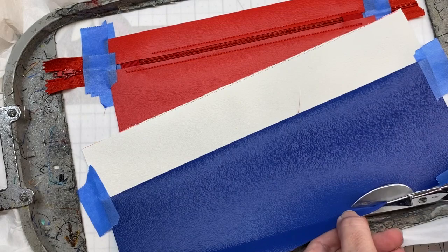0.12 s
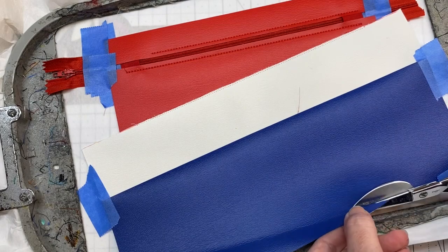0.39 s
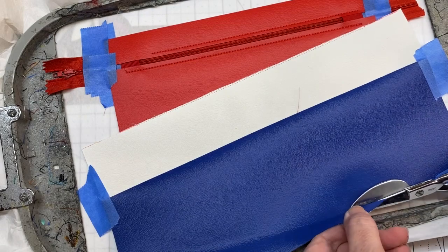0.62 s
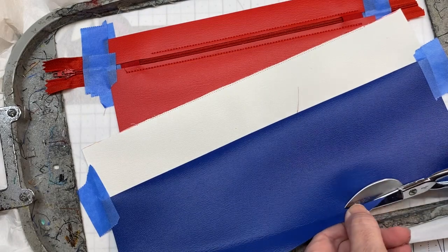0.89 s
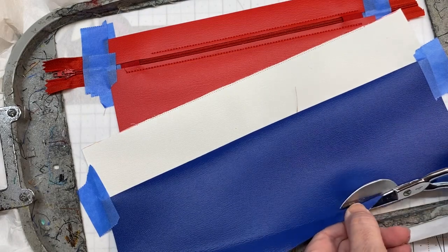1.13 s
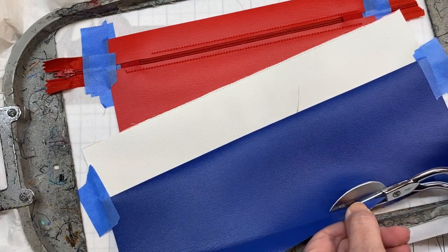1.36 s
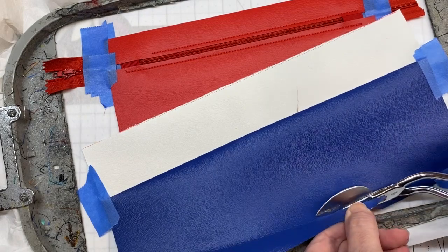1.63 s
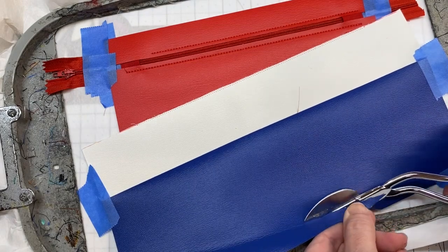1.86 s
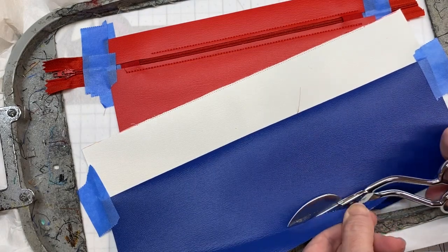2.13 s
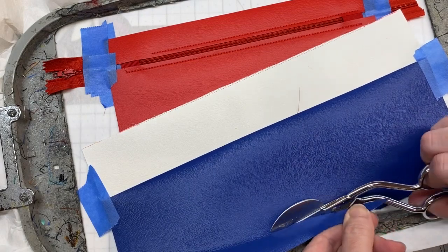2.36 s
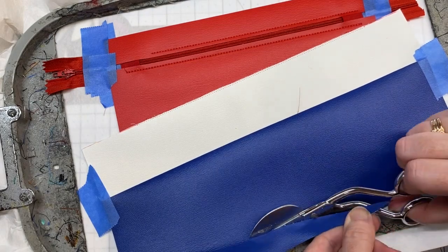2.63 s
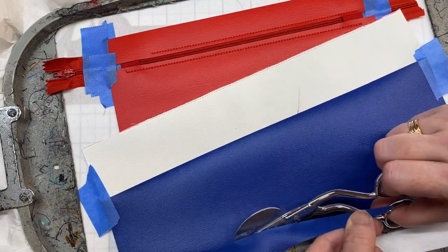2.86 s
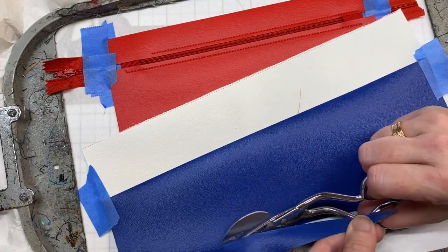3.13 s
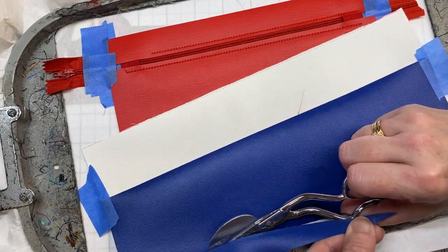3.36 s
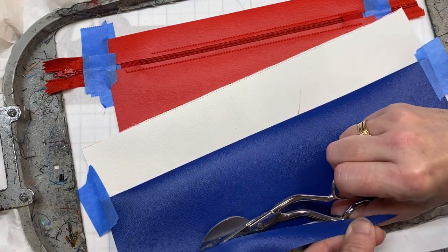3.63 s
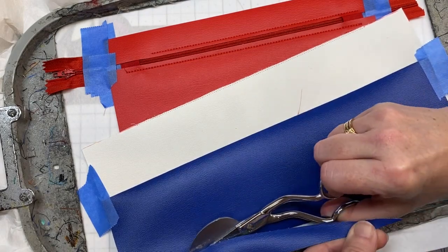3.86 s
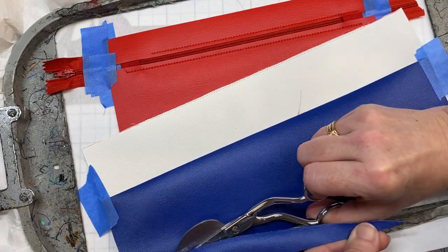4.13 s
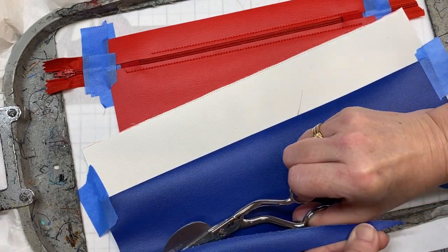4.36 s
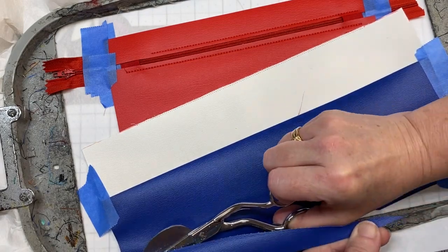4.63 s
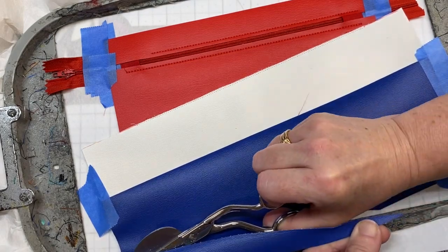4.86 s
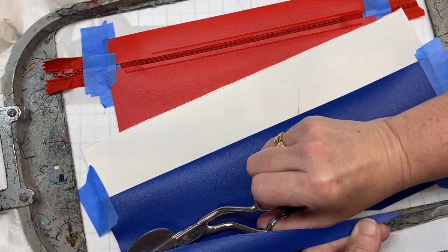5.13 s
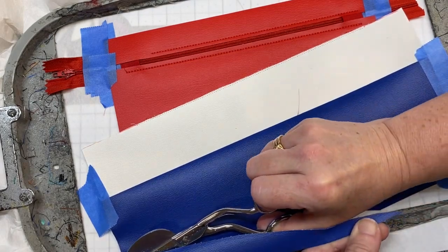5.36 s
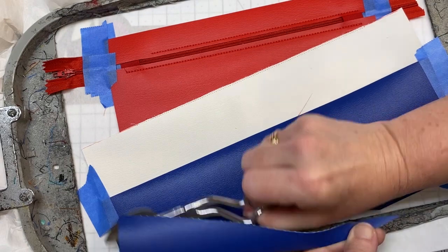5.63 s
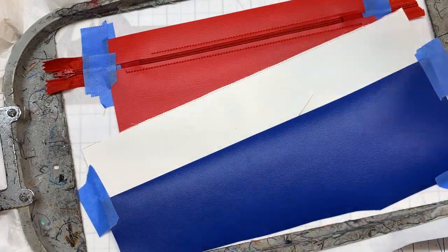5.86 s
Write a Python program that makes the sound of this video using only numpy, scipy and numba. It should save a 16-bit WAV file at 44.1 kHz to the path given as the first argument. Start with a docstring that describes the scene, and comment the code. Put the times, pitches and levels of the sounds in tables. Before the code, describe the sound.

A close, dry stereo perspective in a small quiet room with a very faint hush. At about 0.2 s the blades slide with a small crisp scrape and the vinyl crinkles in tiny cracks; bright ticks follow at 0.4 to 0.7 s with a light rustle and soft table rumble. A dull knock comes near 1.0 s and a tick just after. From about 1.2 s to 5.2 s the scissors shear slowly through cloth-backed vinyl: a quiet, grainy, fluttering rasp of threads parting dozens of times a second, stronger around 2.9 s, swelling and easing, growing brighter and raspier towards the tips. Low hand rumbles and rubs run beneath. The cut thins to sparse ticks, then a quick slide leads to a loud, sharp, bright steel clap at 5.58 s with a brief thin ring and a table thud. Soft knocks, scraping and sheet rustle follow until about 6 s.

```python
"""Scissors through cloth-backed vinyl

Small steel scissors shear slowly through cloth-backed vinyl held in a hoop on a table, in a quiet room.
Backing threads part one by one as puffs of noise, which resonances of sheet and steel colour. The film
crinkles in short cracks; the hand makes the table rumble through its low modes. At the end the blades
clap shut as a cluster of stiff modes, and the scissors are lifted away with a last slide and rustle."""
import sys
import numpy as np
from scipy import signal
from scipy.fft import rfft, irfft, next_fast_len
from scipy.io import wavfile
from scipy.ndimage import uniform_filter1d
from numba import njit

SR = 44100
rng = np.random.default_rng(int(sys.argv[2]) if len(sys.argv) > 2 else 0)


def file_out(sig):
    """Save sig as 16-bit WAV at sys.argv[1]."""
    # one column per channel
    cols = np.atleast_2d(sig).T
    # limit, then scale
    lim = np.clip(cols, -1, 1)
    pcm = np.round(lim * 32767).astype(np.int16)
    wavfile.write(sys.argv[1], SR, pcm)


def rack_gain(trim_db):
    """Turn a fader trim in dB into the linear factor to multiply a signal by."""
    fader = np.asarray(trim_db, float)
    return 10 ** (fader / 20)


N = 264600   # samples: six seconds


def rms_one(x):
    """Scales a sound to an average (rms) level of 1."""
    return x / np.sqrt(np.mean(x ** 2) + 1e-20)


def in_time(rows):
    """Draws straight lines between table rows; the first column is the time in seconds."""
    s, *columns = np.transpose(rows)
    return [np.interp(np.arange(N) / SR, s, c) for c in columns]


def band(x, low_hz, high_hz, order=2):
    """Keeps the tones between two pitches."""
    sos = signal.butter(order, [low_hz, min(high_hz, .47 * SR)], "band", fs=SR, output="sos")
    return signal.sosfilt(sos, x)


def drift(rate):
    """Slow random wandering: straight lines between chance values, 2 * rate of them per second."""
    knots = rng.standard_normal(int(N / SR * rate * 2) + 3)
    return 1.2 * np.interp(np.arange(N) * rate * 2 / SR, np.arange(len(knots)), knots)


def train(times, gains):
    """Puts single-sample clicks at the given times in seconds."""
    clicks = np.zeros(N)
    np.add.at(clicks, (np.asarray(times) * SR).astype(int), gains)
    return clicks


def puffs(clicks, rise_s, fall_s):
    """Each click swells and dies; a unit click peaks near 1."""
    t = np.arange(int(8 * (rise_s + fall_s) * SR)) / SR
    shape = (1 - np.exp(-t / rise_s)) ** 3 * np.exp(-t / fall_s)
    return signal.fftconvolve(clicks, shape / shape.max())[:N]


@njit
def resonance(x, hz, width_hz, sr):
    """Two-pole resonance whose centre may move; white noise keeps its level."""
    out = np.zeros(len(x))
    for i in range(2, len(x)):
        r = np.exp(-np.pi * width_hz[i] / sr)
        out[i] = (np.sqrt((1 - r * r) / 2) * (x[i] - x[i - 2])
                  + 2 * r * np.cos(2 * np.pi * hz[i] / sr) * out[i - 1] - r * r * out[i - 2])
    return out


def peaks(x, table):
    """Fixed resonances side by side, signs alternating."""
    one = np.ones(N)
    total = np.zeros(N)
    for k, (hz, width, db) in enumerate(table):
        total += (-1) ** k * rack_gain(db) * resonance(x, hz * one, width * one, SR)
    return total


def ring(clicks, hz, t60):
    """A unit click sets a sine of height 1 ringing, 60 dB down after t60 seconds."""
    r, w = rack_gain(-60 / (t60 * SR)), 2 * np.pi * hz / SR
    # the tiny offset keeps the filter from slowing down on near-zero numbers
    return signal.lfilter([0, np.sin(w)], [1, -2 * r * np.cos(w), r * r], clicks + 1e-18)


def loudest(start, length, db, swell_db, rise_db_per_s, fade_db_per_s):
    """Gestures set in, swell to their level and fade; the loudest one at each moment gives (dB, its number)."""
    t = np.arange(N)[:, None] / SR - start
    swell = swell_db * np.clip(1 - t / length, 0, 1)
    rise = rise_db_per_s * np.maximum(-t, 0)
    fade = fade_db_per_s * np.maximum(t - length, 0)
    levels = db - swell - rise - fade
    return np.maximum(levels.max(axis=1), -130), levels.argmax(axis=1)


# colour of the hush, only its shape counts: pitch_hz, level_db (per Hz)
AIR_COLOUR = [(30, 7.5), (120, -2.5), (300, -13), (700, -21.5), (3000, -34.5), (16000, -45.5)]


def air():
    """The hush of the room and the microphone, alike in both ears only in the bass."""
    hz = np.arange(N // 2 + 1) * SR / N + 1
    colour_hz, colour_db = np.transpose(AIR_COLOUR)
    colour = rack_gain(np.interp(np.log(hz), np.log(colour_hz), colour_db))
    mid, side = rfft(rng.standard_normal((2, N))) * colour
    apart = np.sqrt(1 / (1 + (440.0 / hz) ** 2))
    hush = irfft(np.array([mid + apart * side, mid - apart * side]), N)
    return rack_gain(-68) * rms_one(hush)


def room(x):
    """Echoes between the walls: eight feedback delays a side, duller on every round."""
    t60_s, wall_cut_hz = 0.31, 17000
    size = next_fast_len(N + SR)
    w = 2 * np.pi * np.arange(size // 2 + 1) / size
    dull = 1 / (1 + 1j * w * SR / (2 * np.pi * wall_cut_hz)) ** 1.2
    out = np.zeros((2, len(w)), complex)
    for k, lag in enumerate((rng.uniform(0.0055, 0.024, 16) * SR).astype(int)):
        loop = rack_gain(-60 * lag / SR / t60_s) * dull * np.exp(-1j * w * lag)
        out[k % 2] += loop / (1 - loop) * (-1) ** (k // 2)
    return irfft(out * rfft(x, size), size)[:, :N]


# how far the left port leads the right: pitch_hz, lead_radians
PORT_PHASE = [(0, 0), (400, 1.1), (1200, .1), (3100, -1.2), (6800, -.4), (8800, 3.14), (10800, 6.3),
              (13300, 9.42), (15300, 12.2), (17000, 13.5)]
# how much louder the left port is: pitch_hz, left_over_right_db
PORT_BALANCE = [(200, -3), (700, -6), (2400, -3), (4400, -7.5), (8500, -2.5), (16000, 1)]


def ports(x):
    """The two microphone ports hear a near source with a level and phase offset that depends on pitch."""
    hz = np.arange(N // 2 + 1) * SR / N
    phase = np.interp(hz, *np.transpose(PORT_PHASE))
    tilt = rack_gain(np.interp(hz, *np.transpose(PORT_BALANCE)) / 2)
    return irfft(rfft(x) * np.array([tilt, np.exp(-1j * phase) / tilt]), N)


# the hand pushes sheet and hoop over the table: start_s, length_s, rumble_db, rubbing_db
PUSHES = [(0.554, 0.23, -67.5, -69.5), (0.89, 0.074, -68, -72), (1.35, 0.52, -72.5, -83),
          (1.82, 0.68, -67.5, -77), (2.38, 0.56, -66.5, -92), (3.275, 0.62, -65, -64),
          (3.99, 0.36, -67, -76), (4.478, 0.1, -58.5, -64), (4.606, 0.18, -66, -73.5),
          (4.845, 0.23, -74, -86.5), (5.563, 0.012, -64, -62.5), (5.685, 0.094, -58.5, -60.5),
          (5.822, 0.023, -58.5, -75.5)]
# pitch of the rubbing, moving with the place of the hand: time_s, pitch_hz
RUB_PITCH = [(.7, 461), (3.3, 329), (4.5, 233.4), (5.7, 367.5)]
# modes of the table top: pitch_hz, level_db, t60_s (time to die by 60 dB after a knock)
TABLE_MODES = [(74.1, -9, 0.26), (142.8, -2, 0.042), (183, 2.5, 0.08), (253.5, 3, 0.028),
               (462, -14.5, 0.15), (809, 8, 0.0049), (2000, 8.5, 0.0015)]


def pushes():
    """The hand's pushes drive the lowest table modes with noise, and rub at a moving pitch."""
    rest_db = -88   # both sounds stay at this level at rest
    start, length, *levels = np.transpose(PUSHES)
    rumble_db, rub_db = [np.maximum(loudest(start, length, db, 0, 284, 93)[0], rest_db) for db in levels]
    noise = rng.standard_normal((2, N))
    rub_hz, = in_time(RUB_PITCH)
    # here the modes die faster than after a knock
    shaken = sum(rack_gain(db) * ring(noise[0], hz, 0.3 * t60) for hz, db, t60 in TABLE_MODES[:4])
    rumble = rack_gain(rumble_db + 0.58 * drift(22)) * rms_one(band(shaken, 43, 275))
    rub = rms_one(resonance(band(noise[1], 110, 766), rub_hz, 0.41 * rub_hz, SR))
    return rumble + rack_gain(rub_db + 1.1 * drift(33)) * rub


# knocks on the table: time_s, level_db (of the blow, before the modes), brightness_hz, drag_s
KNOCKS = [(.969, -41, 1670, 0.0014), (5.581, -42, 500, 0.0064), (5.747, -52.5, 2040, 0.013),
          (5.818, -45.5, 1330, 0.039)]


def knocks():
    """A blow and a short drag set all modes of the table top ringing."""
    noise = rng.standard_normal(N)
    blows = np.zeros(N)
    for s, db, bright_hz, drag_s in KNOCKS:
        t = np.maximum(np.arange(N) / SR - s, 0)
        drag = 0.2 * noise * (t > 0) * np.exp(-t / drag_s)
        blows += rack_gain(db) * band(train([s], 1) + drag, bright_hz / 10.3, bright_hz)
    out = np.zeros(N)
    for hz, db, t60 in TABLE_MODES:
        late = int(.09 * SR / np.sqrt(hz))   # bending waves: the low modes arrive later
        out += rack_gain(db) * ring(np.roll(blows, late), hz, t60)
    return out


# film crinkling and small ticks: time_s, peak_db (before the shanks colour it), centre_hz
CRINKLES = [(0.2, -38, 2860), (0.218, -42.5, 3240), (0.2325, -44.5, 3500), (.2585, -48, 3250),
            (0.273, -48, 3380), (0.294, -52, 2960), (.337, -46, 1350), (0.361, -51, 3240),
            (.381, -49.5, 8600), (1.191, -60, 2200), (0.547, -51, 5800), (0.401, -47, 10000),
            (0.431, -34.5, 8900), (0.578, -34, 10000), (0.607, -33.5, 10100), (0.618, -35, 7240),
            (0.622, -35, 6400), (0.653, -42.5, 10000), (0.685, -50.5, 6000), (0.868, -44, 10300),
            (1.046, -52, 8700), (1.053, -37.5, 10700), (5.715, -43, 2100), (5.7215, -42.5, 2000),
            (5.814, -40, 7100), (5.822, -41.5, 2320), (5.961, -60.5, 6420), (5.994, -52, 4060)]
# resonances of the shanks that colour the tear and the ticks: pitch_hz, width_hz, level_db
SHANKS = [(3224, 1500, -4), (5250, 212, -2.5), (6272, 210, -11.5)]


def crinkles():
    """Each crinkle is a crack of noise about a millisecond long, broad with a soft centre."""
    size = 2048
    out = np.zeros(N + size)
    t = np.arange(size) / SR
    shape = t / 0.00095 * np.exp(-t / 0.00056) + 0.05 * np.exp(-t / 0.005)
    for (s, db, hz), noise in zip(CRINKLES, rng.standard_normal((len(CRINKLES), size))):
        crack = noise * shape
        centre = band(crack, hz / 1.25, hz * 1.363) * np.sqrt(8000 / hz)
        crack = centre + 0.44 * band(crack, hz / 3.24, hz * 4.1)
        at = int((s - .0006) * SR)
        out[at:at + size] += rack_gain(db) * crack / np.abs(crack).max()
    return out[:N] + rack_gain(-8.5) * peaks(out[:N], SHANKS)


# stiff modes of the clap, relative to each other: pitch_hz, level_db
CLAP_MODES = [(2700, -19), (5600, 2), (6100, 0.5), (7750, -2), (9650, 4.5), (10150, -2), (12100, -4),
              (14900, 7.5), (15650, 6.5)]
# thin ring of the scissors after the clap: pitch_hz, level_db (relative), t60_s
CLAP_RING = [(3750, -7.5, 0.098), (5810, -11.5, 0.31), (5530, -2.5, 0.4), (10000, -9, 0.24),
             (14930, -2, 0.15)]


def clap():
    """Steel meets steel: a millisecond of contact sounds every stiff mode, with a small bounce and a thin ring."""
    clap_s, crack_db, ring_db = 5.5838, -9.5, -52.5
    t, turns = np.arange(N) / SR - clap_s, rng.random(len(CLAP_MODES))
    contact = np.exp(-(t / .0008) ** 2)
    contact += rack_gain(-16) * np.exp(-((t - .0022) / .002) ** 2)   # bounce
    contact += rack_gain(-26) * np.exp(-((t + .002) / .002) ** 2)   # faint touch just before
    modes = sum(rack_gain(db) * np.sin(2 * np.pi * (hz * t + turn)) for (hz, db), turn in zip(CLAP_MODES, turns))
    hiss = band(rng.standard_normal(N), 2200, 17000)
    crack = rack_gain(crack_db) * contact * rms_one(modes + 0.9 * hiss)
    return crack + sum(rack_gain(ring_db + db) * ring(train([clap_s], 1), hz, t60) for hz, db, t60 in CLAP_RING)


# usual rate of parting threads, before chance sways it: time_s, threads_per_s
THREAD_RATE = [(1.4, 60), (1.7, 42), (2.05, 74), (2.55, 80), (2.95, 48), (3.6, 44), (4.4, 80)]
# the strongest threads parting: time_s, level_db (before lowering and colouring)
STRONG_THREADS = [(1.228, -61.5), (1.3641, -52), (1.821, -50), (2.8556, -40.5), (2.886, -44), (2.925, -42),
                  (2.949, -44), (3.007, -47), (3.029, -44.5), (3.111, -46.5), (3.156, -48), (4.182, -43),
                  (4.264, -47.5), (4.339, -48.5), (4.708, -45.5), (4.793, -44), (4.8254, -46),
                  (4.904, -50.5), (4.964, -50.5), (5.06, -48.5), (5.1522, -49.5), (5.3726, -54.5),
                  (5.4251, -48.5)]


def threads():
    """Threads part at a swaying rate, each a puff of force; gives the steady pulsing and the strong puffs."""
    per_s, = in_time(THREAD_RATE)
    passed = np.floor(np.cumsum(per_s * rack_gain(3.6 * drift(25))) / SR)
    strength_db = 3.3 * np.clip(rng.standard_normal(N), -3, 1.7) + 1.8 * drift(10)
    parted = np.diff(passed, prepend=0) * rack_gain(strength_db)
    s, level_db = np.transpose(STRONG_THREADS)
    # no other thread parts beside a strong one
    parted = parted * (uniform_filter1d(train(s, 1), size=900) < 1e-9)
    pulsing = rms_one(.27 + puffs(parted, .003, .0018))   # .27: steady shear between the threads
    return pulsing, puffs(train(s - .002, rack_gain(level_db - 9)), .0015, .002)


# force of the cut: time_s, sheet_db, tear_db
CUT = [(1.15, -116, -109), (1.22, -71.5, -90), (1.4, -70.5, -69.5), (1.76, -78.5, -69), (1.87, -68.5, -68),
       (2.28, -70, -64.5), (2.9, -70, -56.5), (3.17, -74.5, -63), (3.26, -70, -57.5), (3.57, -68.5, -63),
       (3.63, -73.5, -75), (3.78, -70.5, -60), (4.2, -64.5, -63.5), (4.4, -70, -67.5), (4.5, -60, -60.5),
       (4.68, -65.5, -65), (4.88, -73.5, -72.5), (5.08, -74.5, -75), (5.2, -110, -104.5), (5.34, -108, -99),
       (5.38, -76.5, -76.5), (5.52, -84, -83.5)]
# the blades slide without cutting: start_s, swell_s, tear_db, ring_over_tear_db, fade_db_per_s
SLIDES = [(0, 0.0032, -64.5, -12, 32), (0.184, 0.013, -50, -3, 230), (.565, 0.043, -67, 3, 254),
          (5.533, 0.044, -43.5, -13, 170.5), (5.69, 0.043, -62.5, -13, 109.5)]
# the loose sheet rustles: start_s, swell_s, level_db, fade_db_per_s
RUSTLES = [(0, 0.13, -82.5, 58), (0.197, 0.0065, -68, 133), (0.53, 0.26, -67.5, 58),
           (5.66, 0.039, -64.5, 66), (5.822, 0.031, -56.5, 155)]


def forces(t, cutting):
    """Force levels of sheet, tear and blade ring: from the cut while it lasts, else from rustles and slides."""
    sets_in_db_per_s = 880
    sheet_db, tear_db = in_time(CUT)
    start, swell, db, ring_db, fade = np.transpose(SLIDES)
    slide_db, which = loudest(start, swell, db, 15, sets_in_db_per_s, fade)
    start, swell, db, fade = np.transpose(RUSTLES)
    rustle_db, _ = loudest(start, swell, db, 8.5, sets_in_db_per_s, fade)
    # the ring over the tear thins as the cut nears the tips: 12.5 dB at first, losing 7.5 dB per s
    ring_db = np.where(cutting, 12.5 - 7.5 * (t - CUT[0][0]), ring_db[which])
    under_way = (t > CUT[0][0]) & (t < CUT[-1][0])
    tear_db = np.where(under_way, tear_db, slide_db)
    return np.where(under_way, sheet_db, rustle_db), tear_db, tear_db + ring_db


# centres of sheet and tear, moving through the cut; the sheet drops early, then climbs towards the end:
# time_s, sheet_hz, tear_hz
SHEET_AND_TEAR = [(0, 2060, 3470), (.3, 2100, 3280), (.6, 1730, 5540), (.88, 1560, 5370), (1.4, 1920, 4300),
                  (1.9, 930, 4240), (2.6, 1040, 4500), (2.9, 1390, 3730), (3.8, 1370, 5000),
                  (4.2, 2370, 5100), (4.5, 2540, 3960), (5.1, 3400, 4100), (5.5, 2700, 3970),
                  (5.76, 1151, 3400), (5.9, 2140, 3460)]
# broad rasp over the rings, growing towards the tips: time_s, level_db
RASP = [(1.1, 1), (1.3, -28), (2.7, -9), (3.3, -4.5), (5.5, 13.5)]
# blade rings while shearing or sliding: pitch_hz, width_hz, level_db
BLADES = [(10260, 270, -11.5), (14400, 110, -7.5), (14500, 520, 0)]


def cut():
    """Shear and slides push noise through the moving sheet resonance, the shanks and the ringing blades."""
    cutting_start_s, cutting_end_s = 1.17, 5.45
    t = np.arange(N) / SR
    cutting = (t > cutting_start_s) & (t < cutting_end_s)
    sheet_hz, tear_hz = in_time(SHEET_AND_TEAR)
    sheet_db, tear_db, blade_db = forces(t, cutting)
    over_tear_db = blade_db - tear_db
    pulsing, strong = threads()
    pulsing = np.where(cutting, pulsing, rack_gain(2.5 * drift(60)))   # otherwise the blades only slide
    rasp = rack_gain(in_time(RASP)[0])
    sheet_noise, tear_noise = rng.standard_normal((2, N))
    tear_push = rack_gain(tear_db) * pulsing + strong

    cut_push = tear_push * rack_gain(np.minimum(sheet_db - tear_db, 9)) + rack_gain(sheet_db - 9.0)
    sheet_force = sheet_noise * np.where(cutting, cut_push, rack_gain(sheet_db) * pulsing)
    width = np.where(t > cutting_start_s, .7, .5) * sheet_hz   # the uncut sheet rings more narrowly
    flap = resonance(resonance(sheet_force, sheet_hz, width, SR), sheet_hz, width, SR)
    sheet = flap * np.sqrt(2 * np.pi * width / SR) + band(sheet_force * cutting, 1010, 2350)

    tear_force = tear_noise * tear_push
    tear = resonance(tear_force, tear_hz, 0.33 * tear_hz, SR) + peaks(tear_force, SHANKS)
    tear += rasp * band(tear_force, 4460, 7270)

    blade_force = tear_force * rack_gain(over_tear_db)
    # the upper rings stop thinning at -6.5 dB in the cut, and are weaker in slides
    high_db = np.where(cutting, np.maximum(over_tear_db, -6.5), over_tear_db - 16.5)
    rings = peaks(blade_force, BLADES[:1]) - peaks(tear_force * rack_gain(high_db), BLADES[1:])
    scrape = rasp * band(blade_force, 4140, 23000)
    return sheet + rack_gain(-10.5) * tear + rack_gain(-7.0) * rings + scrape


def scene():
    """Sums scissors, film and table at the ports, and adds the room's echo and hush."""
    near = cut() + crinkles() + clap()
    sources = near + pushes() + knocks()
    # the wide sheet spreads its middle tones round the room
    sent = near + rack_gain(1.0) * band(sources, 140, 2100)
    return ports(sources) + rack_gain(-17.5) * room(sent) + air()


def low_pass(x):
    """Removes everything above the highest recorded frequency."""
    return signal.sosfilt(signal.butter(12, 17330, fs=SR, output="sos"), x)


def record(dry):
    """Filters away the top treble above 16.7 kHz and the deepest bass below 55 Hz."""
    passed = signal.sosfilt(signal.cheby2(10, 50, 16700, fs=SR, output="sos"), dry)
    passed = signal.sosfilt(signal.butter(3, 55, "high", fs=SR, output="sos"), passed)
    return low_pass(passed)


dry = scene()
out = record(dry)
file_out(out)
```